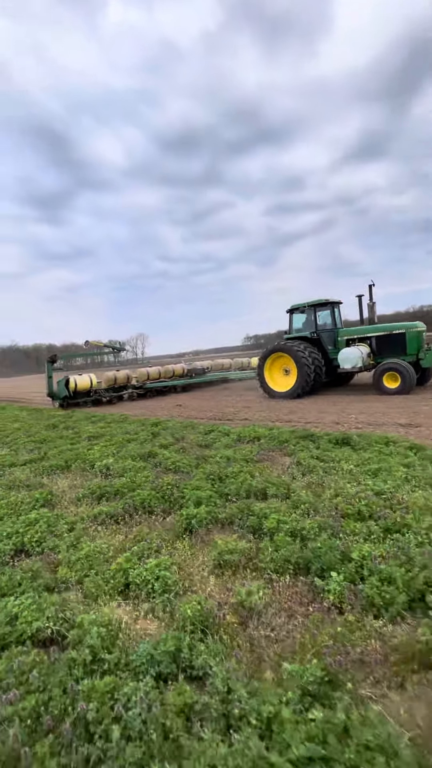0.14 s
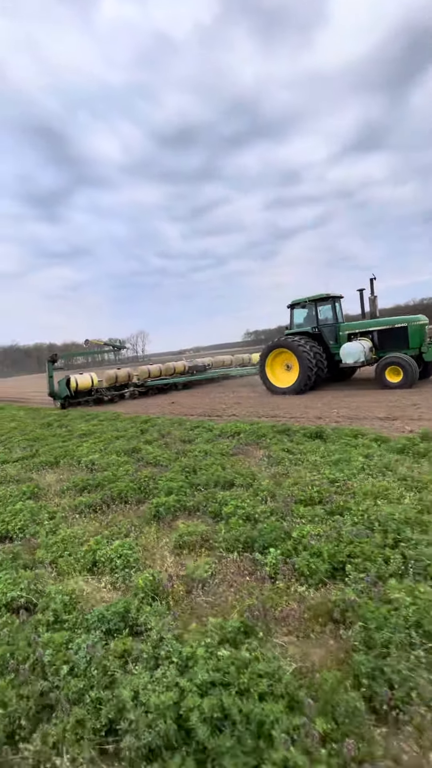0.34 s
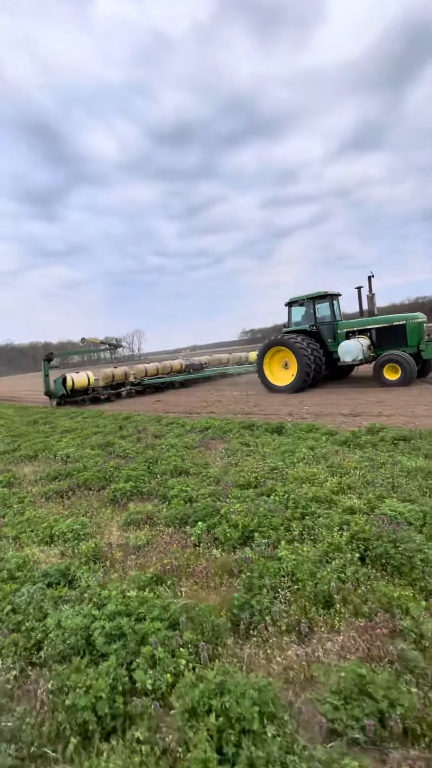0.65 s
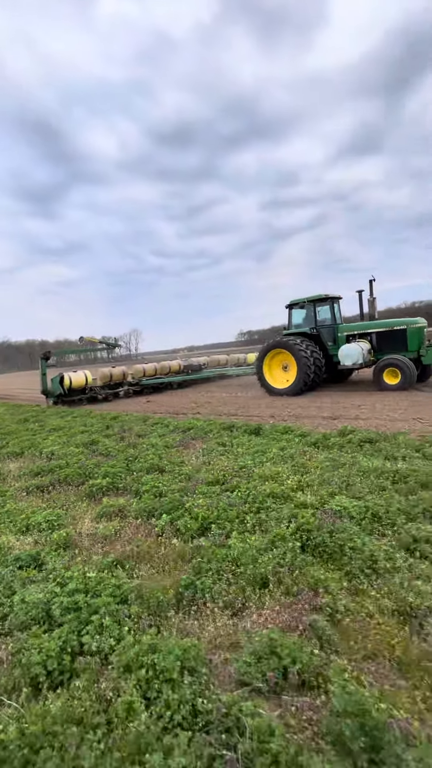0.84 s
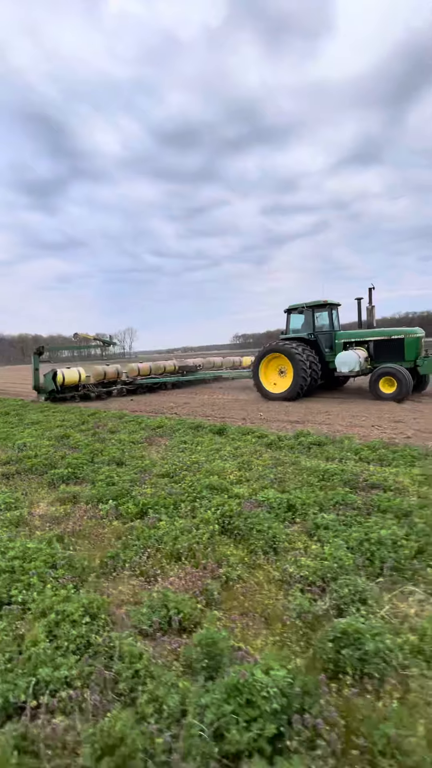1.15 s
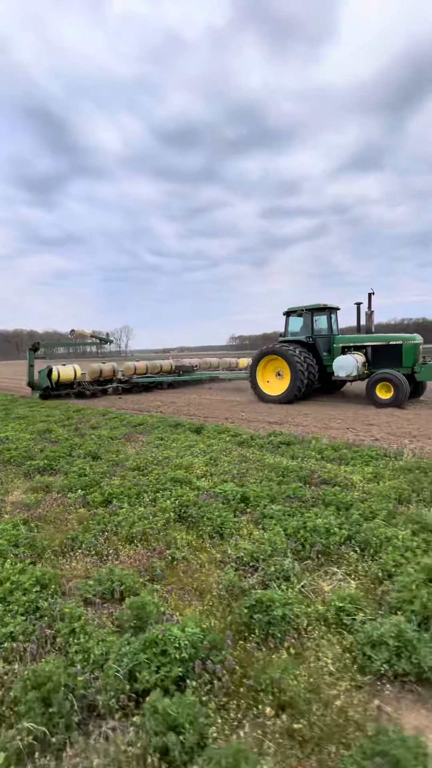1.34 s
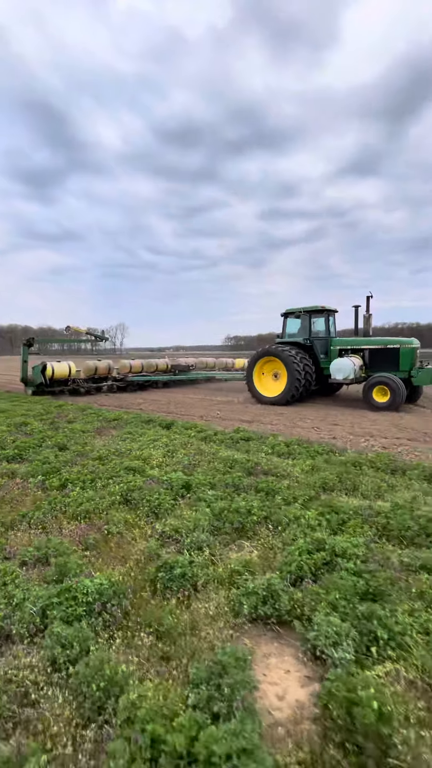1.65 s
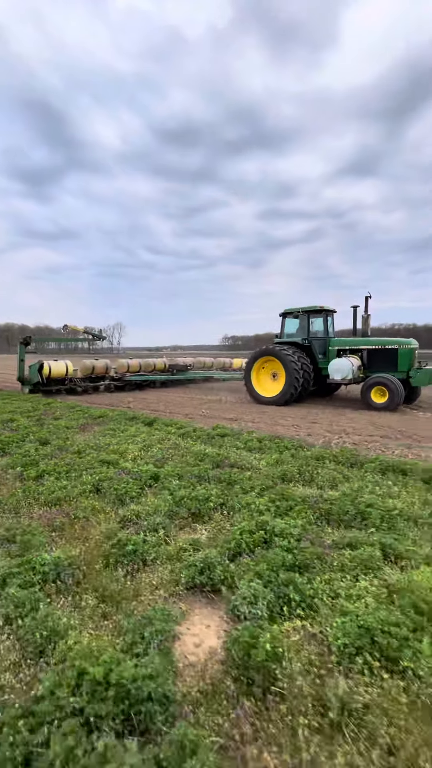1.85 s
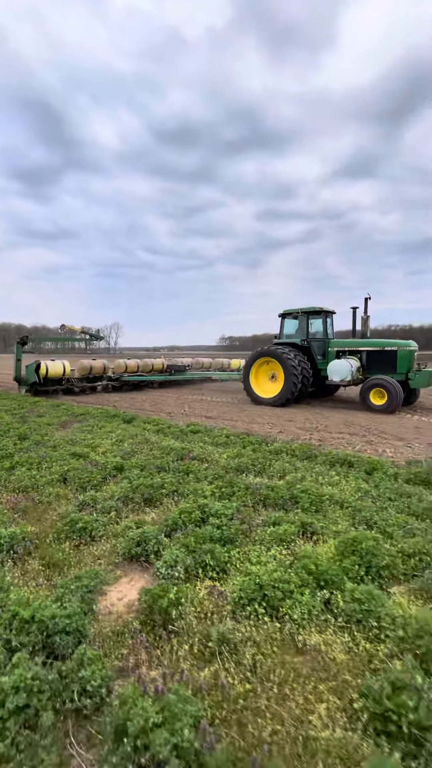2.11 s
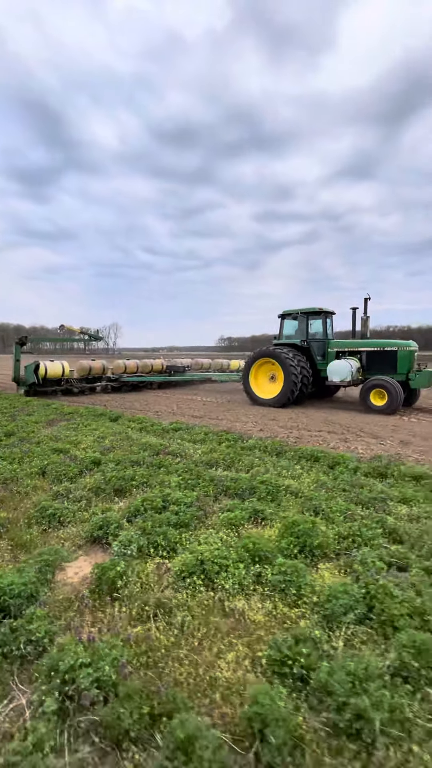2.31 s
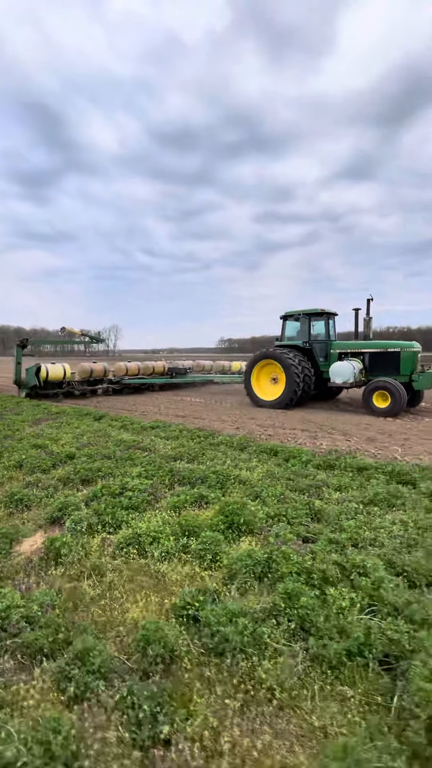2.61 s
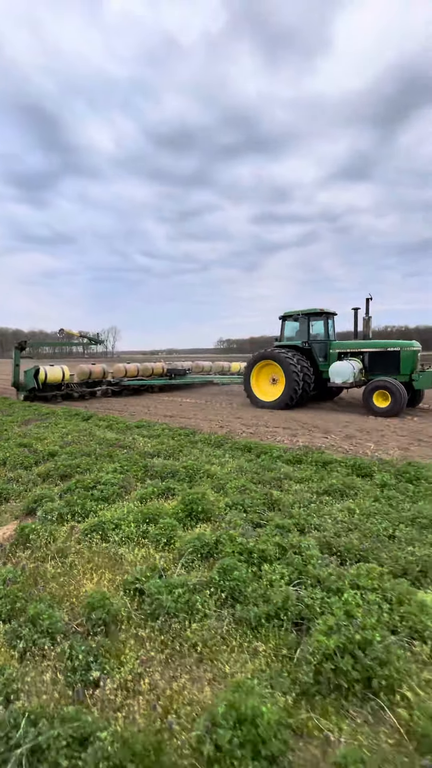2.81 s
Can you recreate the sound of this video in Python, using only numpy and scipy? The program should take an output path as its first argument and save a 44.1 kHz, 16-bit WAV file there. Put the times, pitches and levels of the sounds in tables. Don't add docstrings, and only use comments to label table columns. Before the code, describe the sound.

A diesel tractor engine roars steadily across an open field while wind thumps the microphone

```python
import sys
import numpy as np
from scipy import signal
from scipy.fft import rfft, irfft
from scipy.io import wavfile

SR = 44100
rng = np.random.default_rng(int(sys.argv[2]) if len(sys.argv) > 2 else 0)


def transcribe(u):
    v = np.clip(np.atleast_2d(u).T, -1, 1)
    q = np.round(v * 32767).astype(np.int16)
    wavfile.write(sys.argv[1], SR, q)


def natural_amplitude(level_db):
    exponent = np.asarray(level_db, float) / 20
    return 10 ** exponent


N = 130977
T = np.arange(N) / SR
HZ = np.maximum(np.arange(N // 2 + 1) * SR / N, 1.)
LEFT_RIGHT = np.array([[1], [-1]])


def curve(rows):
    return np.interp(T, *np.transpose(rows))


def at_hz(rows, column=1, hz=HZ):
    rows = np.array(rows)
    return np.interp(np.log(hz), np.log(rows[:, 0]), rows[:, column])


def rms_one(x):
    return x / np.sqrt(np.mean(x ** 2) + 1e-20)


def bandpass(x, order, low_hz, high_hz):
    return signal.sosfilt(signal.butter(order, [low_hz, high_hz], "band", fs=SR, output="sos"), x)


def drift(rate_hz, count=1):
    pole = np.exp(-128 * np.pi * rate_hz / SR)
    white = rng.standard_normal((count, N // 64 + 2002))
    slow = signal.lfilter([1], [1, -2 * pole, pole * pole], white)[:, 2000:]
    return np.array([np.interp(np.arange(N) / 64, np.arange(len(s)), rms_one(s)) for s in slow])


# t/s, level/dB
WIND_LEVEL = [(0, -31.5), (.12, -41), (.31, -24), (.45, -35), (.7, -39), (.78, -52), (1.08, -51),
              (1.2, -39), (1.35, -35), (1.55, -38), (1.63, -18), (1.72, -38), (2.25, -32), (2.4, -28.5),
              (2.55, -31), (2.7, -31), (2.8, -24), (2.97, -13.5)]


def wind():
    alike, lump_db = .2, 2.6
    white = rng.standard_normal((3, N))
    low = bandpass(np.sqrt(alike) * white[0] + np.sqrt(1 - alike) * white[1:], 3, 48, 150)
    lumpy = rms_one(low) * natural_amplitude(lump_db * drift(16, count=2))
    return natural_amplitude(curve(WIND_LEVEL)) * rms_one(lumpy)


# t/s, peak level/dB, f/Hz, left minus right/dB
EDDY_THUMPS = [(0.191, -37, 60, 3), (.347, -9.5, 60, 2), (0.405, -15.5, 110, 5), (0.478, -20, 273, -11),
               (0.589, -32, 55, -4), (.86, -17, 365, 3), (0.8656, -20, 365, 3), (0.872, -22, 365, 3),
               (1.19, -25, 80, -21), (1.247, -24, 60, 9), (1.615, -20.5, 55, 12), (1.645, -11, 140, 6),
               (2.099, -24, 55, 2), (2.229, -17.5, 66.5, -2), (2.374, -25, 170, -6), (2.691, -30, 75, 15),
               (2.801, -7, 75, 2), (2.86, -8, 78.4, 2), (2.905, -17, 65, -6), (2.952, -15.5, 99, 2)]


def eddies():
    half_cycles, lag_cycles = 0.53, 0.11
    out = np.zeros((2, N))
    lags = rng.normal(0, lag_cycles, (len(EDDY_THUMPS), 2, 1))
    for (s, db, hz, pan_db), lag in zip(EDDY_THUMPS, lags):
        turns = (T - s) * hz + lag
        level = natural_amplitude(db + pan_db * LEFT_RIGHT / 2)
        out = out + level * np.exp(-(turns / half_cycles) ** 2) * np.sin(2 * np.pi * turns)
    return out


# t/s, half length/s, level/dB, top f/Hz
GUST_EVENTS = [(0.172, 0.076, -30.5, 500), (0.31, 0.086, -31, 450), (0.486, 0.06, -26.5, 800),
               (0.57, .04, -27.5, 650), (.67, 0.029, -23, 600), (1.13, 0.022, -27, 380),
               (1.19, 0.029, -27.5, 300), (1.477, 0.027, -33, 220), (1.62, 0.064, -21, 493),
               (1.733, 0.045, -27, 170), (2.074, 0.057, -41, 170), (2.376, 0.029, -19.5, 805),
               (2.434, 0.023, -21, 450), (2.56, 0.055, -31.5, 400), (2.682, 0.051, -22.5, 650),
               (2.767, 0.07, -24, 220), (2.91, 0.032, -24, 500)]


def gusts(bass):
    opposed, low_hz, turn_db = 0.86, 85, 14.5
    hiss_db, hiss_hz, hiss_width_hz = -36, 7800, 700
    white = rng.standard_normal((4, N))
    rush = rfft(np.sqrt(opposed) * LEFT_RIGHT * white[0] + np.sqrt(1 - opposed) * white[1:3])
    rush = irfft(rush / np.sqrt((1 + (low_hz / HZ) ** 6) * HZ ** 0.62), N)
    hiss = irfft(rfft(white[3]) / (1 + ((HZ - hiss_hz) / hiss_width_hz) ** 4), N)
    hiss = natural_amplitude(hiss_db) * rms_one(hiss)
    out = np.zeros((2, N))
    for s, half_s, db, top_hz in GUST_EVENTS:
        near = abs(T - s) < 3 * half_s
        band = signal.sosfilt(signal.butter(3, top_hz, fs=SR, output="sos"), rush[:, near])
        turned = min(natural_amplitude(db + turn_db), 1) * LEFT_RIGHT * bass[0, near]
        swell = np.exp(-((T[near] - s) / half_s) ** 2)
        out[:, near] += swell * (natural_amplitude(db) * (rms_one(band) + hiss[near]) + turned)
    return out


def knock():
    start_s, level_db, pitch_hz, t60_s = 2.428, -29, 2850, 0.035
    after = np.maximum(T - start_s, 0)
    band = bandpass(rng.standard_normal(N), 2, pitch_hz, 1.2 * pitch_hz)
    left_right_db = np.array([[0], [-8]])
    return natural_amplitude(level_db - 60 * after / t60_s + left_right_db) * (after > 0) * rms_one(band)


# f/Hz, level/dB per Hz
ROAR_SPECTRUM = [(45, 2.5), (150, 1.5), (900, 0), (1600, -5.5), (2900, -7), (3600, -13), (9000, -18),
                 (13200, -32)]
# f/Hz, width/Hz, level/dB
HOUSING_PEAKS = [(590, 49, 2), (1960, 154, 7), (2163, 122, 6.5), (2397, 61, 4.5), (2740, 50, 0.5),
                 (4450, 640, 3.5), (4940, 950, 2.5), (7300, 1100, -1), (15400, 2600, 14)]


def colour(x):
    db = at_hz(ROAR_SPECTRUM)
    for hz, width_hz, peak_db in HOUSING_PEAKS:
        db = db + peak_db / (1 + (2 * (HZ - hz) / width_hz) ** 2)
    return irfft(rfft(x) * natural_amplitude(db) * np.minimum(1, (HZ / 40) ** 2), N)


def roar(cycles):
    level_db, patchy_db, throb = -24, .5, 0.075
    firing = np.cos(12 * np.pi * cycles)
    full = rfft(colour(rng.standard_normal((3, N)) * (1 + throb * firing)))
    edges_hz = 40 * 2. ** np.arange(10)
    out = np.zeros((3, N))
    for low, high, patch in zip(edges_hz, edges_hz[1:], drift(9, count=9)):
        octave = irfft(full * ((HZ >= low) & (HZ < high)), N)
        out += natural_amplitude(patchy_db * patch) * octave
    return natural_amplitude(level_db) * rms_one(out)


def clatter(cycles):
    level_db, jitter_s, low_hz, top_hz = -33.5, .00004, 1450, 2710
    size = 2048
    phase = np.exp(2j * np.pi * rng.random(size // 2 + 1))
    loop = irfft(phase * natural_amplitude(rng.normal(0, 3.8, size // 2 + 1)), size)
    place = (cycles + 16.6 * jitter_s * drift(8.6)[0]) % 1 * size
    x = np.interp(place, np.arange(size + 1), np.r_[loop, loop[0]])
    return natural_amplitude(level_db) * rms_one(colour(bandpass(x, 3, low_hz, top_hz)))


ENGINE_ORDER = np.array([6, 11, 12, 18, 20, 22, 24, 27, 30, 32, 33, 36, 44, 46, 48, 50, 51, 52, 54, 57, 60, 63, 64, 66, 68, 69, 70, 71, 75, 76, 78, 80, 84, 91, 100])
ENGINE_ORDER_DB = [-27, -37.5, -36.5, -33, -43, -43.5, -51.5, -55, -44, -37.5, -42, -39, -45, -45.5, -48,
                   -50.5, -44.5, -41, -43, -42, -44.5, -40, -54, -42.5, -47.5, -41, -43, -55, -47.5, -42,
                   -48.5, -54, -44, -44.5, -59]
PUMP_HARMONIC_DB = [-38, -36, -34.5, -43.5, -36, -69, -62, -48, -44.5, -49.5, -52]


def tones(cycles):
    pump_strokes_per_cycle, waver_db, waver_rad = 14.385, .55, .13
    pump = pump_strokes_per_cycle * np.arange(1, len(PUMP_HARMONIC_DB) + 1)
    multiples = np.r_[ENGINE_ORDER, pump]
    levels_db = np.r_[ENGINE_ORDER_DB, PUMP_HARMONIC_DB]
    shake = drift(5.7, count=len(multiples) + 1)
    start = rng.uniform(0, 2 * np.pi, len(multiples))
    out = np.zeros(N)
    for k, (m, db) in enumerate(zip(multiples, levels_db)):
        reach = np.log10(m)
        level = np.sqrt(2) * natural_amplitude(db + waver_db * reach / 1.9 * shake[k])
        out += level * np.sin(2 * np.pi * m * cycles + start[k] + waver_rad * reach * shake[k + 1])
    return out


# t/s, f/Hz
CYCLE_RATE = [
    (0, 16.58),
    (1.5, 16.65),
    (2.97, 16.70),
]


def engine_cycles():
    return np.cumsum(curve(CYCLE_RATE)) / SR


# f/Hz, left minus right/dB, left lag/rad, likeness/0-1
PORT_PATTERN = [(60, 2, 0.2, .97), (252, 2.5, 0.45, 0.96), (560, -0.5, 1.15, .9), (864, -2.5, 1.59, 0.68),
                (1180, -10, 2.5, 0.04), (1355, -5.5, 6.04, 0.62), (2020, -1.5, 5.24, 0.74),
                (2530, 4.5, 4.7, 0.8), (2690, 9, 6.6, 0), (2725, 3, 8.7, 0.67), (3275, 0, 9.2, 0.87),
                (3580, -4.5, 13.46, 0.05), (4415, -1.5, 15.3, 0.9), (4780, -0.3, 15.71, 0.985),
                (4930, 7, 16.43, .8), (5380, 2.5, 15.9, 0.4), (5960, -1.5, 20.4, 0.34),
                (6040, -3.5, 17.6, 0.72), (7020, 2, 15.8, 0.9), (9350, 0, 15.71, 0.95),
                (13700, 1.5, 15.71, 0.96), (14700, 0.5, 15.6, 0.9), (15600, 0, 15, 0.68)]
# t/s, pitch factor/1
BEARING_SHIFT = [
    (0, .935),
    (.9, 1.01),
    (2.0, 1.02),
    (2.97, 1.08),
]


def ports(steady, noise, count=7):
    slide_from_hz = 3600
    steady, noise = rfft(steady), rfft(noise)
    times = np.linspace(0, N / SR, count)
    sliding = np.clip(HZ / slide_from_hz * 4 - 3.6, 0, 1) * np.clip(7 - HZ / 1000, 0, 1)
    out = 0
    for s in times:
        hz = HZ / np.interp(s, *np.transpose(BEARING_SHIFT)) ** sliding
        alike = np.clip(at_hz(PORT_PATTERN, 3, hz), 0, 1)
        lag = np.exp(-.5j * LEFT_RIGHT * at_hz(PORT_PATTERN, 2, hz))
        mix = (steady + np.sqrt(alike) * noise[0]) * lag + np.sqrt(1 - alike) * noise[1:]
        tilt = natural_amplitude(LEFT_RIGHT * at_hz(PORT_PATTERN, 1, hz) / 2)
        tilt = tilt / np.sqrt(np.mean(tilt ** 2, axis=0))
        crossfade = np.maximum(1 - abs(T - s) / times[1], 0)
        out = out + crossfade * irfft(mix * tilt, N)
    return out


def tractor():
    cycles = engine_cycles()
    steady = tones(cycles) + clatter(cycles)
    edge_fade = np.clip(np.minimum(T, T[-1] - T) / .004, 0, 1)
    return ports(steady * edge_fade, roar(cycles))


def bass_of(x):
    return irfft(rfft(x) / (1 + (HZ / 400) ** 2.9), N)


# t/s, bass level/dB
BASS_GAIN = [(0, -9.5), (.42, -2.5), (.5, -38), (.56, -8), (.64, -10.5), (1.1, -3), (1.58, -1.5),
             (1.63, -22), (1.7, -1.5), (2.3, -0.5), (2.38, -9.5), (2.55, -0.5), (2.65, -4), (2.97, 2)]


def wind_filter_change(bass):
    flutter_db = .7
    gain = natural_amplitude(curve(BASS_GAIN) + flutter_db * drift(6.7, count=2))
    return (gain - 1) * bass


def scene():
    machine = tractor()
    bass = bass_of(machine)
    return machine + wind_filter_change(bass) + gusts(bass) + wind() + eddies() + knock()


def top_cut(x):
    return signal.sosfilt(signal.butter(12, 15730, fs=SR, output="sos"), x)


def record(dry):
    low_hz = 32.2
    thin = signal.sosfilt(signal.butter(2, low_hz, "high", fs=SR, output="sos"), dry)
    return top_cut(thin)


dry = scene()
out = record(dry)
transcribe(out)
```